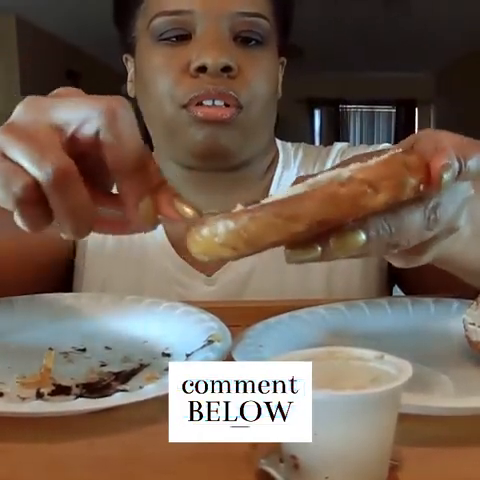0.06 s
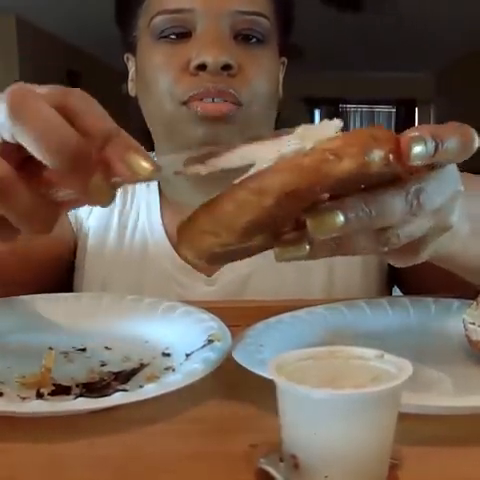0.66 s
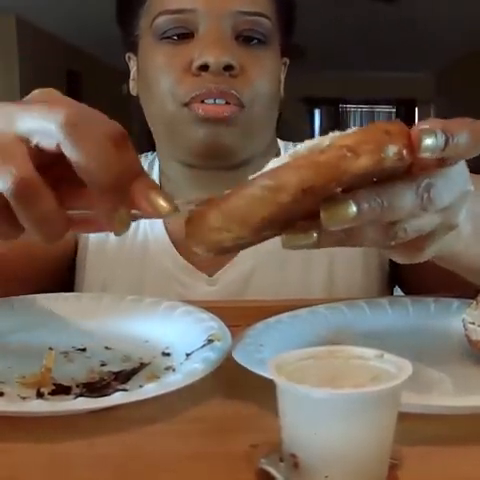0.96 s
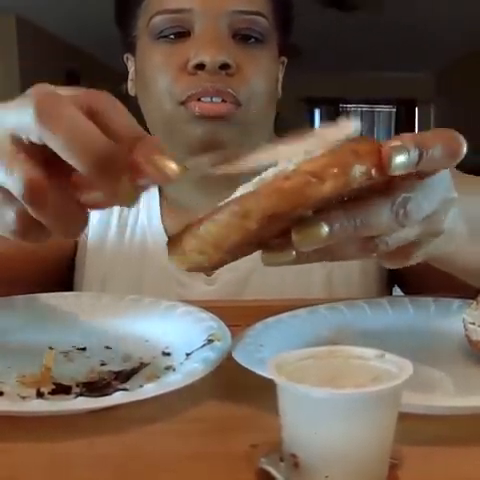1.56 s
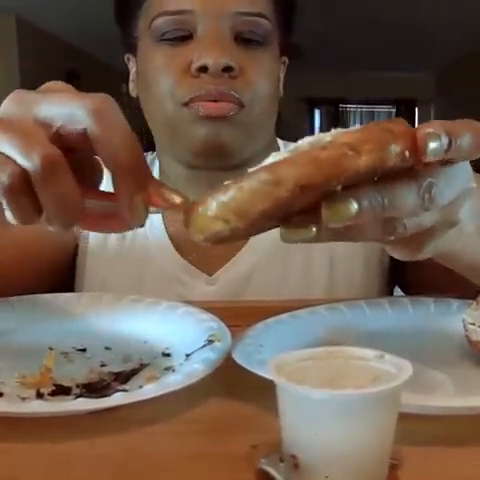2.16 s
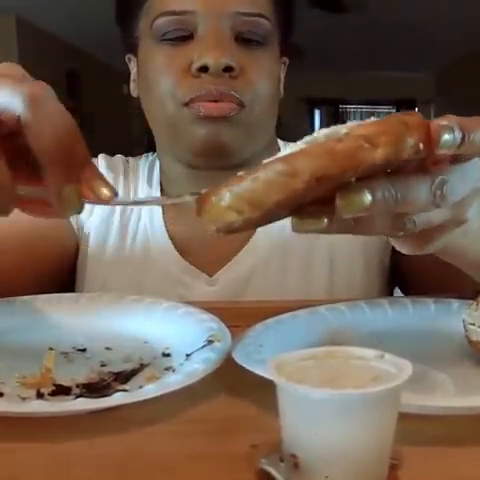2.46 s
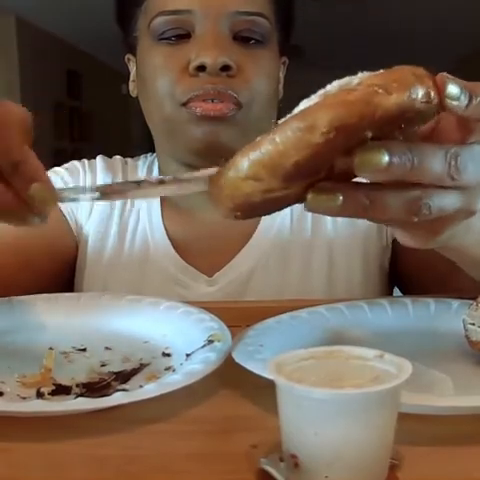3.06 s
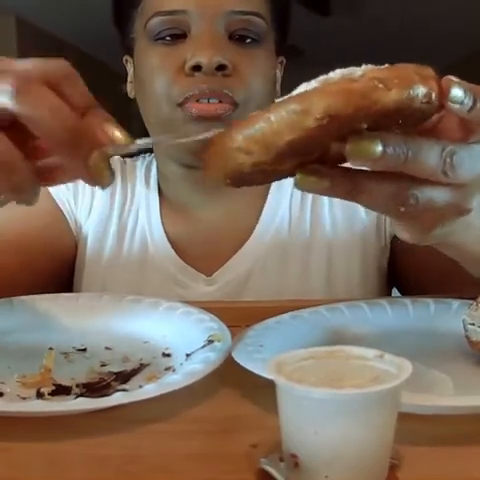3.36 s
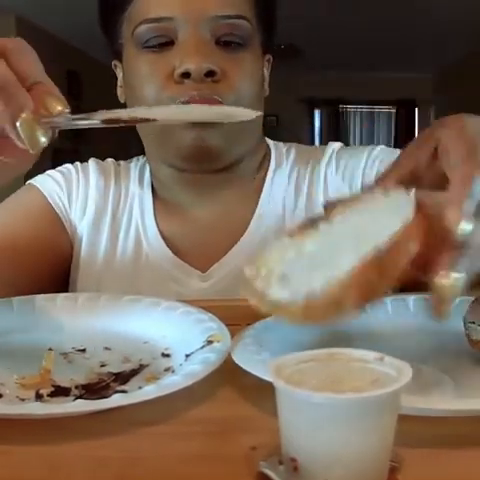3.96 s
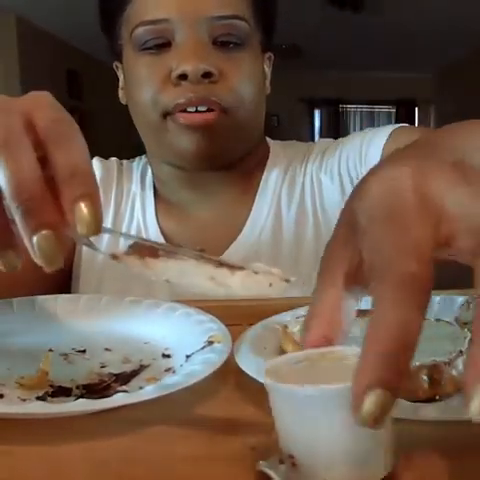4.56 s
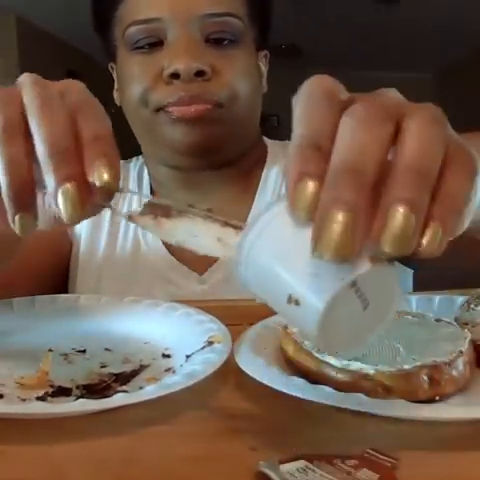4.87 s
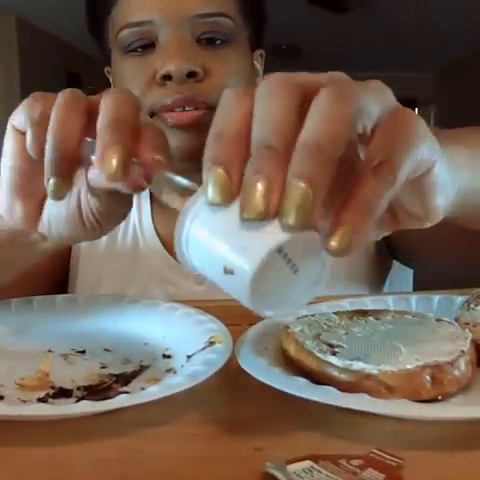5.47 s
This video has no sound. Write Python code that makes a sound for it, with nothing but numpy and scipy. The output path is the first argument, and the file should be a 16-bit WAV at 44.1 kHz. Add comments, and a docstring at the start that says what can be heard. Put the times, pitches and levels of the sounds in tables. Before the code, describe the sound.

A plastic knife scrapes over a toasted bagel in short crackly strokes, then the bagel drops onto a foam plate with a thud.

```python
"""A small room with a humming fan, the microphone close to a toasted bagel on a table.
A plastic knife spreads cream cheese in short strokes: the crust rasps and snaps under the blade,
and wet pockets of air pop in the cheese. The bagel drops on a foam plate, which clatters and
shakes the table; then the knife scrapes inside the cheese tub."""
import sys
import numpy as np
from scipy import signal
from scipy.fft import rfft, irfft, next_fast_len
from scipy.io import wavfile
from scipy.ndimage import uniform_filter1d, map_coordinates

SR = 44100
rng = np.random.default_rng(int(sys.argv[2]) if len(sys.argv) > 2 else 0)


def persist_wave(psi):
    """Save psi, clipped to +-1, as 16-bit WAV."""
    counts = np.round(np.clip(psi, -1, 1) * 32767).astype(np.int16)
    wavfile.write(sys.argv[1], SR, np.atleast_2d(counts).T)


N = 248283


def amp(db):
    return 10 ** (np.asarray(db) / 20)


def unit_rms(x):
    return x / np.sqrt(np.mean(x ** 2) + 1e-20)


def along(points, hz):
    """Read (freq_hz, value) points on a log frequency axis."""
    freqs, values = np.transpose(points)
    return np.interp(np.log(hz + 1), np.log(freqs + 1), values)


def wobble(knots_per_s):
    """A smooth random curve."""
    knots = rng.standard_normal(int(N * knots_per_s / SR) + 4)
    return map_coordinates(knots, [np.arange(N) * knots_per_s / SR])


def filtered(x, response):
    """Apply a gain that depends on frequency."""
    size = next_fast_len(len(x) + 8192)
    return irfft(rfft(x, size) * response(np.fft.rfftfreq(size, 1 / SR)), size)[:len(x)]


def coloured(x, spectrum):
    """Shape x by a spectrum, at rms 1."""
    return unit_rms(filtered(x, lambda hz: amp(along(spectrum, hz))))


def add(track, start_s, sound):
    """Mix a sound into the track."""
    part = track[round(start_s * SR):][:len(sound)]
    part += sound[:len(part)]


# The rush of air in the room: freq_hz, density_db
FAN_AIR = [(13, -26.5), (22, -4.5), (80, -7.5), (103, -1.5), (211, -6.5), (356, -7), (432, -10),
           (469, -7.5), (510, -12), (690, -17.5), (771, -19.5), (961, -19.5), (3150, -31), (3420, -32.5),
           (16000, -45.5)]
# The hum behind the table: pitch_hz, level_db
FAN_TONES = [(113.0, -63.5), (215.3, -68.5), (296.1, -63), (473.7, -64), (710.6, -74), (1717, -78.5),
             (3553, -83), (8107, -89)]


def fan():
    """A fan's low rush with slightly unsteady tones."""
    t = np.arange(N) / SR
    hum = 0
    for hz, db in FAN_TONES:
        level = np.sqrt(2) * amp(db + 1.1 * wobble(4.565))
        hum += level * np.sin(2 * np.pi * hz * t + 0.24 * wobble(3.9))
    return amp(-53.5) * coloured(rng.standard_normal(N), FAN_AIR) + amp(-1) * hum


# The small room's decay: freq_hz, t60_s
ROOM_DECAY = [(100, 0.41), (500, 0.45), (2000, 0.43), (6000, 0.38), (15000, 0.35)]


def room(x, delay_s):
    """The walls answer after a short delay; treble dies first."""
    hz, t, noise = signal.stft(rng.standard_normal(SR * 2 // 3), SR, nperseg=256)
    tail = signal.istft(noise * amp(-60 * t / along(ROOM_DECAY, hz)[:, None]), SR, nperseg=256)[1]
    delayed = np.pad(x, (round(delay_s * SR), 0))
    return signal.fftconvolve(delayed, tail / np.linalg.norm(tail))[:N]


# The share of the landing that comes back to the microphone: freq_hz, gain_db
WALL_RETURN = [(200, -8.5), (1500, -14.5), (3000, -15), (7000, -12), (12000, -13), (16000, -21.5)]


def wall_echo(landing):
    """The walls return the landing, bass most strongly."""
    return filtered(room(landing, delay_s=0.006), lambda hz: amp(along(WALL_RETURN, hz)))


def near_reflections(x, first_s, spread_s):
    """Early copies off the table, the plate and the nearest wall."""
    echo = np.zeros(SR // 10)
    for delay_s, gain in zip(first_s + spread_s * rng.random(size=40), rng.standard_normal(size=40)):
        add(echo, delay_s, np.array([gain]))
    return signal.fftconvolve(x, echo / np.linalg.norm(echo))[:N]


def ring(modes, t, scatter_db):
    """Damped modes, struck at new strengths each time."""
    hz, db, t60 = np.transpose(modes)[:, :, None]
    sign = (-1) ** np.arange(len(hz))[:, None]
    struck_db = db + scatter_db * rng.standard_normal(hz.shape)
    return np.sum(sign * amp(struck_db - 60 * t / t60) * np.sin(2 * np.pi * hz * t), 0)


# The table and what stands on it: pitch_hz, level_db, t60_s
TABLE_MODES = [(40.6, -4.5, 1.6), (67, 4, .42), (117, -10.5, 0.18), (163.4, 0.5, 0.21), (286, -1, .17),
               (326, -2, 0.18)]
# The bagel's weight reaches the table: start_s, level_db
TABLE_THUDS = [(4.035, -29.5), (4.114, -31), (4.173, -43)]
# The hands jog the table: start_s, level_db
TABLE_JOGS = [(1.285, -55), (1.645, -51.5), (2.809, -54)]


def table_boom():
    """The table booms and sways on after the landing; soft jogs stir only its lowest modes."""
    out, t = np.zeros(N), np.arange(SR) / SR
    for start_s, db in TABLE_THUDS:
        boom = ring(TABLE_MODES, t, scatter_db=3.5)
        add(out, start_s, amp(db) * boom * (1 - np.exp(-t / 0.0047)))
    for start_s, db in TABLE_JOGS:
        sway = ring(TABLE_MODES[:2], t, scatter_db=-10) * amp(5 - 60 * t / 0.39)
        add(out, start_s, amp(db) * sway * (1 - np.exp(-t / 0.015)))
    return out


# The bagel lands on its edge, slaps flat and rocks: start_s, level_db, t60_s, tilt_db_per_octave
BAGEL_CONTACTS = [(4.002, -18, 0.096, -0.5), (4.011, -18, 0.049, 0), (4.033, -13.5, 0.13, 0),
                  (4.0376, -9.5, 0.042, -1), (4.0425, -5.5, 0.031, 1), (4.054, -15, 0.045, 1),
                  (4.1073, -25, 0.052, 7.5), (4.124, -24, .045, 4.5), (4.135, -24, 0.032, 3)]
# The slap on the foam: freq_hz, density_db
SLAP_SPECTRUM = [(40, -31), (90, -13.5), (160, 2), (215, -8.5), (275, 0), (380, -7), (520, 1), (700, -7.5),
                 (1200, -3.5), (2200, -8), (3050, -6.5), (3700, -13.5), (4800, -14.5), (7300, -19),
                 (9300, -31), (11300, -21.5), (16000, -39.5)]
# The foam plate's ring: pitch_hz, level_db, t60_s
PLATE_MODES = [(528, 2, 0.05), (772, -5.5, .13), (840, -8, .13), (1130, -0.5, 0.12), (1275, -1.5, 0.13),
               (1370, 0, .16), (1584, -4, .14), (1720, -1.5, .13), (1823, -0.5, 0.1), (2430, -1, 0.072),
               (2680, -2.5, 0.15), (2780, -2, 0.09), (3160, -1, .1), (3430, -5, 0.068), (4470, -2, 0.11),
               (4570, 0, 0.11)]


def bagel_drop():
    """Each contact of the bagel makes the light plate clatter on the table and ring."""
    out, t = np.zeros(N), np.arange(SR // 2) / SR
    # after the slap the plate rebounds, weaker each time
    rebounds = [(4.063 + 0.011 * k, -23 - k, 0.065, -0.5) for k in range(3)]
    for start_s, db, t60, tilt_db in BAGEL_CONTACTS + rebounds:
        colour = lambda hz: amp(along(SLAP_SPECTRUM, hz) + tilt_db * np.log2(1 + hz / 2000))
        clatter = unit_rms(filtered(rng.standard_normal(len(t)), colour)) * amp(-60 * t / t60)
        plate = ring(PLATE_MODES, t, scatter_db=5)
        plate /= np.std(plate[:SR // 50])
        add(out, start_s, amp(db) * (amp(3.5) * clatter + amp(-16.5) * plate))
    return out


# The cheese, heard from close by: start_s, level_db, pitch_hz
CHEESE_POPS = [(0.8542, -35, 1330), (0.853, -37.5, 2800), (0.875, -29.5, 1270), (1.702, -43, 2680),
               (1.731, -36.5, 2780), (1.9363, -39.5, 4450), (1.938, -37.5, 3340), (4.34, -34.5, 1475),
               (4.377, -30, 1397)]


def cheese_pops():
    """Small wet pockets of air open and ring unevenly for a few cycles."""
    out, t = np.zeros(N), np.arange(SR // 30) / SR
    for start_s, db, hz in CHEESE_POPS:
        waver = 0.04 * np.sqrt(hz / 2000) * np.cumsum(rng.standard_normal(len(t)))
        envelope = amp(db - 60 * t / 0.011) * (1 - np.exp(-t / 0.0005))
        add(out, start_s, envelope * np.sin(2 * np.pi * hz * t + waver))
    return out


def crack(spectrum, t60_s, tilt_db, hardness):
    """A short dry crack with a peak near 1: a hard one starts at once, a soft one crumbles in."""
    t = np.arange(SR // 30) / SR
    tilted = [(hz, db + tilt_db * np.log2(hz / 5000)) for hz, db in spectrum]
    hiss = coloured(rng.standard_normal(len(t)), tilted)
    crumble = amp(-60 * t / t60_s) * (1 - np.exp(-t / 0.00046))
    burst = hiss * (crumble + hardness * amp(-60 * t / 0.012))
    return burst / np.std(burst[:SR // 500]) / 2.94


# The bright and the dull part of a click: freq_hz, density_db
SNAP_SPECTRUM = [(1500, -28), (3600, -11), (4800, -2), (7300, -0.5), (8600, -9), (12000, -10.5),
                 (16000, -24)]
KNOCK_SPECTRUM = [(200, -11.5), (600, -1.5), (950, -8.5), (1600, -2.5), (2700, -4), (3600, -15),
                  (8000, -41.5)]


def clicks(rows, snap_gain_db, knock_gain_db, snap_t60_s, knock_t60_s):
    """Each release snaps and knocks; loud ones are harder, and a light knock leaves a brighter snap."""
    out = np.zeros(N)
    for start_s, snap_db, knock_db in rows:
        tilt_db = 0.98 * np.clip(snap_db - knock_db, 0, 15) - 4.5
        hardness = np.clip((snap_db + 37.5) / 8, 0, 2)
        snap = amp(snap_db + snap_gain_db) * crack(SNAP_SPECTRUM, snap_t60_s, tilt_db, hardness)
        knock = amp(knock_db + knock_gain_db) * crack(KNOCK_SPECTRUM, knock_t60_s, 0, hardness)
        add(out, start_s, snap + knock)
    return out


# Ticks from the plate, then from the tub: start_s, snap_db, knock_db
PLATE_AND_TUB_TICKS = [(4.2745, -39.5, -51), (4.357, -39.5, -61), (4.514, -46.5, -50), (4.537, -48.5, -52),
                       (5.409, -39, -42), (5.4225, -41, -43), (5.4425, -47, -39), (5.469, -52, -37.5),
                       (5.5735, -38.5, -45), (5.618, -41.5, -41)]


def plate_and_tub_ticks():
    """The foam plate ticks as it settles, and the plastic tub as the knife scoops."""
    return clicks(PLATE_AND_TUB_TICKS, snap_gain_db=-0.5, knock_gain_db=3,
                  snap_t60_s=0.014, knock_t60_s=0.0174)


def patchy(x, depth_db):
    """The colour drifts as the point of contact travels along the blade."""
    bands = signal.stft(x, nperseg=256)[2]
    drift = uniform_filter1d(rng.standard_normal(bands.shape), size=4, axis=0)
    drift = unit_rms(uniform_filter1d(drift, size=20, axis=1))
    return unit_rms(signal.istft(bands * amp(depth_db * drift), nperseg=256)[1][:N])


# Resonances of the blade and what it rubs: centre_hz, width_hz, gain_db
BLADE_RESONANCES = [(698, 190, 3), (1450, 270, 5), (1900, 250, 1), (2770, 400, 3), (4760, 700, 5)]


def rasp(spectrum, grains_per_s, spread_db, slip_db, hiss_db):
    """Tiny uneven fractures, clumped by stick and slip, and a rubbing hiss sound through the blade."""
    sizes = amp(spread_db * np.minimum(rng.exponential(size=N), 3))
    fractures = sizes * (rng.random(N) < grains_per_s / SR)
    decay = amp(-60 * np.arange(SR // 50) / SR / 0.0046)
    stick_slip = amp(slip_db * np.tanh(wobble(130)))
    grains = unit_rms(signal.fftconvolve(fractures, decay)[:N] * stick_slip)
    friction = grains * rng.standard_normal(N) + amp(hiss_db) * rng.standard_normal(N)
    body = lambda hz: amp(sum(db / (1 + (2 * (hz - centre) / width) ** 2)
                              for centre, width, db in BLADE_RESONANCES))
    return filtered(coloured(friction, spectrum), body)


# The blade works its way into the tub and scoops: time_s, level_db
TUB_SCOOP = [(5.1, -75.5), (5.25, -70), (5.38, -63.5), (5.41, -54), (5.495, -56.5), (5.555, -67),
             (5.58, -53.5), (5.63, -62)]
# The scrape inside the tub: freq_hz, density_db
TUB_SPECTRUM = [(530, -47), (900, -16.5), (1080, -8.5), (1390, -6.5), (1750, 0), (1990, 0.5), (2120, -12.5),
                (2330, -2), (4050, -19), (4920, -7), (5680, -12.5), (6800, -7), (8760, -17), (11800, -15),
                (16000, -35)]


def tub_scrape():
    """The blade drags round the inside of the plastic tub."""
    scoop = amp(np.interp(np.arange(N) / SR, *np.transpose(TUB_SCOOP), left=-120))
    grit = rasp(TUB_SPECTRUM, grains_per_s=670, spread_db=4.5, slip_db=1, hiss_db=-1)
    return scoop * patchy(grit, depth_db=0.5)


def pressure(strokes):
    """The strength of the rubbing: in each stroke the blade touches, presses harder, eases and lifts."""
    touch_db, ease_db, touch_db_per_s, lift_db_per_s = -64.5, 8, 2500, 1000
    t = np.arange(0, N, 32) / SR
    force = 0
    for start_s, press_s, ease_s, db in strokes:
        hardest_s, lift_s = start_s + press_s, start_s + press_s + ease_s
        swell_db = np.interp(t, [start_s, hardest_s, lift_s], [touch_db, db, db - ease_db])
        fade_db = touch_db_per_s * np.maximum(start_s - t, 0) + lift_db_per_s * np.maximum(t - lift_s, 0)
        force += amp(swell_db - fade_db)
    return np.interp(np.arange(N) / SR, t, force + 1e-9)


# Strokes over the bagel, close to the microphone: start_s, press_s, ease_s, level_db, dryness_db
KNIFE_STROKES = [(0, 0.22, 0.024, -63.5, 0.5), (0.235, .06, 0.057, -54.5, 1),
                 (0.85, 0.0087, 0.05, -55, -1.5), (0.9, 0.026, 0.067, -52.5, 2), (1.0, 0.023, 0.14, -60, 2),
                 (1.214, 0.056, .03, -51, -2), (1.657, 0.018, 0.085, -63.5, 2),
                 (1.788, 0.051, 0.23, -63.5, 0.5), (2.125, .015, 0.056, -59.5, -1),
                 (2.371, 0.042, 0.036, -56, -2), (2.46, 0.027, 0.022, -53.5, 3),
                 (2.734, 0.011, 0.071, -54.5, -0.5), (2.858, .04, .007, -64.5, 1.5),
                 (2.965, 0.084, .052, -44, -1.5), (3.376, 0.032, .015, -59, -2.5),
                 (3.584, 0.025, 0.0048, -52, 4.5), (3.812, 0.019, 0.0068, -53, -1.5)]
# The rasp of toasted crust: freq_hz, density_db
CRUST_SPECTRUM = [(450, -15), (750, -5.5), (1450, -3), (1900, -3.5), (2700, -5.5), (3700, -8.5), (5200, -8),
                  (7400, -7.5), (8700, -14.5), (12200, -14), (16000, -29.5)]


def spreading():
    """The blade drags over the toasted face: soft cheese rubs dull, bare crust dry and bright."""
    grit = rasp(CRUST_SPECTRUM, grains_per_s=1100, spread_db=2.5, slip_db=9.5, hiss_db=-3.5)
    grit = patchy(grit, depth_db=3)
    dull = filtered(grit, lambda hz: 1 / (1 + (hz / 3200) ** 4))
    on_cheese = pressure([(*times, db - dryness_db) for *times, db, dryness_db in KNIFE_STROKES])
    on_crust = pressure([(*times, db + dryness_db) for *times, db, dryness_db in KNIFE_STROKES])
    return on_cheese * dull + on_crust * (grit - dull)


def crumbs(per_s, over_rasp_db, spread_db, max_db, knock_offset_db):
    """A chance of a crumb breaking in the opening instant: start_s, snap_db, knock_db."""
    force = pressure([stroke[:4] for stroke in KNIFE_STROKES])
    jitter, size = rng.random(size=(300, 2)).T
    times = (np.arange(len(jitter)) + jitter) / per_s
    force_db = 20 * np.log10(np.interp(times, np.arange(N) / SR, force))
    levels = np.minimum(force_db + over_rasp_db + spread_db * (2 * size - 1), max_db)
    until_s = KNIFE_STROKES[-1][2]
    return [(s, db, db + knock_offset_db) for s, db in zip(times, levels) if s < until_s]


# The larger flakes of crust, close to the microphone: start_s, snap_db, knock_db
CRUST_FLAKES = [(.063, -40, -36.5), (.243, -33.5, -41), (.278, -33, -37), (.323, -34, -54),
                (.855, -47, -31.5), (.92, -33.5, -39.5), (1.052, -35, -55), (1.0925, -29, -36),
                (1.1035, -32.5, -34.5), (1.245, -37, -34), (1.297, -40.5, -36), (1.5635, -34, -31),
                (1.6185, -30.5, -39), (1.674, -36, -41), (1.723, -39.5, -38), (2.135, -43.5, -36.5),
                (2.234, -38.5, -47), (2.27, -36.5, -41), (2.2935, -30.5, -40.5), (2.406, -34.5, -46),
                (2.442, -33.5, -45), (2.4715, -28, -27.5), (2.4865, -26, -31.5), (2.7365, -27, -31.5),
                (2.762, -35, -55), (2.778, -30.5, -44), (3.035, -26.5, -29), (3.05, -26, -35),
                (3.104, -25, -30.5), (3.2565, -26.5, -33), (3.337, -29, -29), (3.611, -35, -45),
                (3.827, -40.5, -31.5)]


def crust_snaps():
    """Flakes break with a bright snap, and the blade gives a dull knock."""
    small = crumbs(per_s=36, over_rasp_db=18, spread_db=7, max_db=-34.5, knock_offset_db=-9)
    return clicks(CRUST_FLAKES + small, snap_gain_db=-1.5, knock_gain_db=-2,
                  snap_t60_s=0.0078, knock_t60_s=0.0059)


def scene():
    """The close knife and the landing with their echoes, over the table's boom and the fan."""
    crackle = crust_snaps() + plate_and_tub_ticks()
    knife = crackle + amp(3) * spreading() + amp(2) * tub_scrape() + cheese_pops()
    landing = bagel_drop()
    early = amp(-10.5) * near_reflections(knife, first_s=0.0027, spread_s=0.012)
    reverb = amp(-13) * room(knife, delay_s=0.0085) + wall_echo(landing)
    return (knife + landing + early + reverb + table_boom() + fan())[None]


def record(dry):
    """One microphone; the recorder rounds off the highest peaks and cuts the top of the treble."""
    ceiling, top_hz = 0.75, 16100
    rounded = dry[0] / (1 + np.abs(dry[0] / ceiling) ** 6) ** (1 / 6)
    return filtered(rounded, lambda hz: 1 / (1 + (hz / top_hz) ** 160))[None]


dry = scene()
out = record(dry)
persist_wave(out)
```